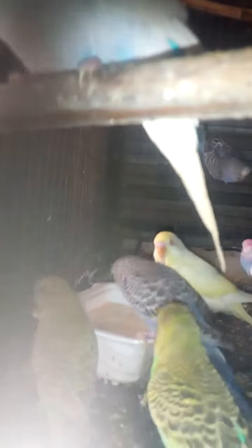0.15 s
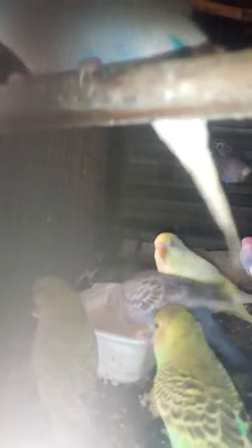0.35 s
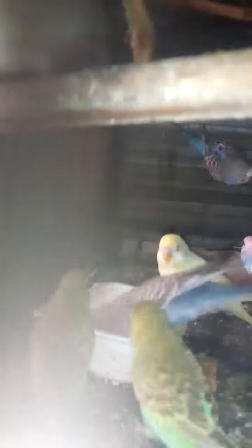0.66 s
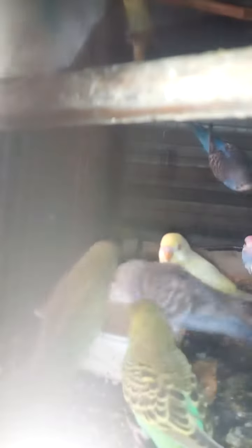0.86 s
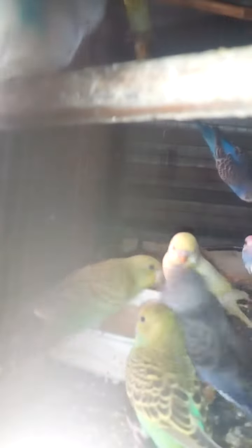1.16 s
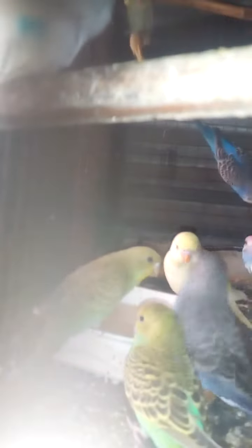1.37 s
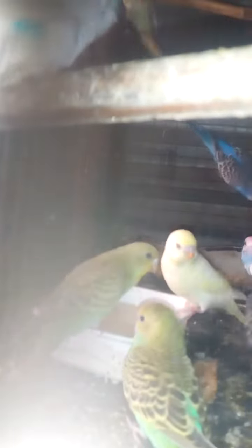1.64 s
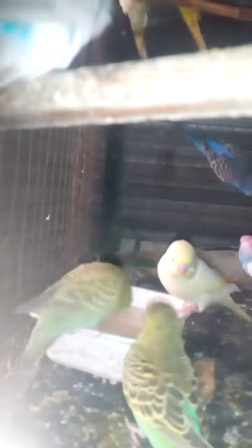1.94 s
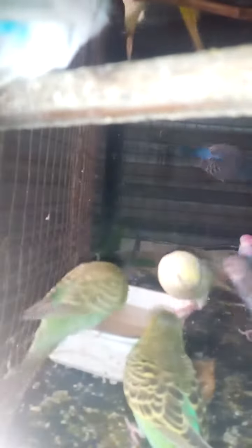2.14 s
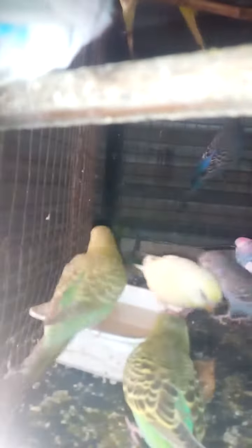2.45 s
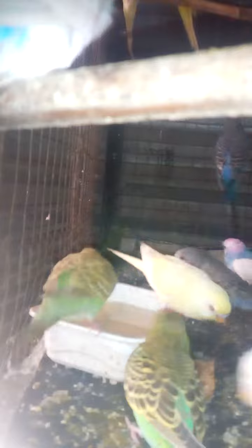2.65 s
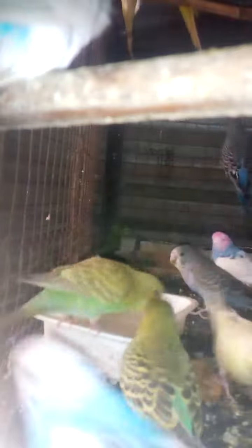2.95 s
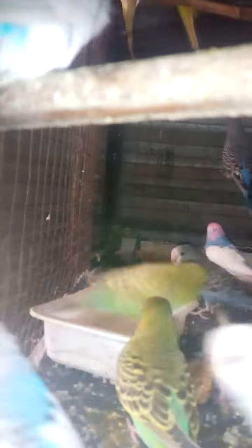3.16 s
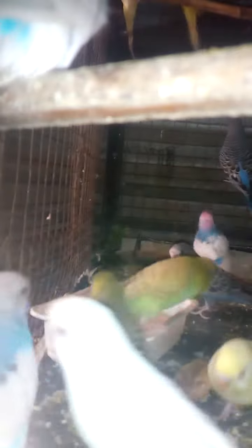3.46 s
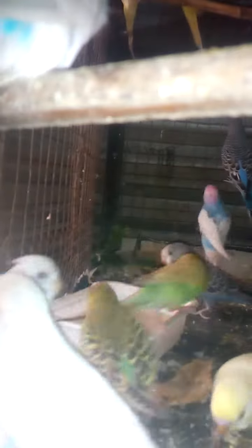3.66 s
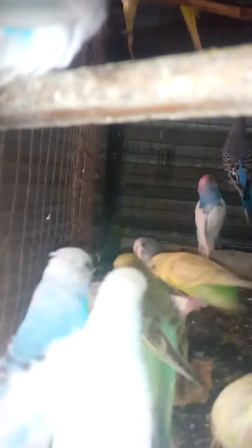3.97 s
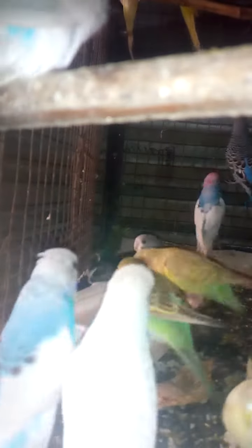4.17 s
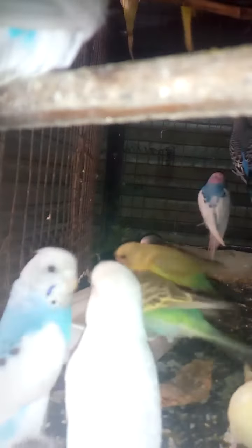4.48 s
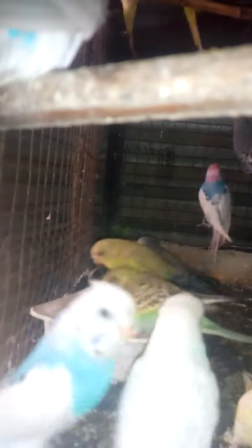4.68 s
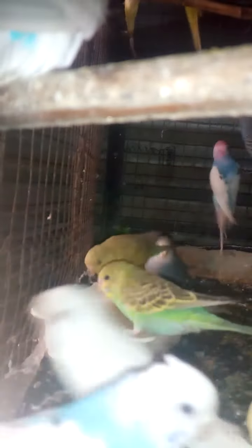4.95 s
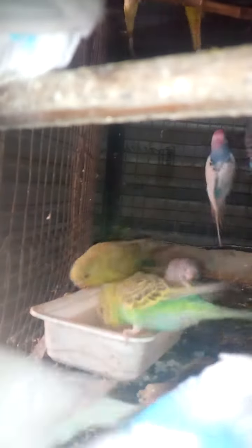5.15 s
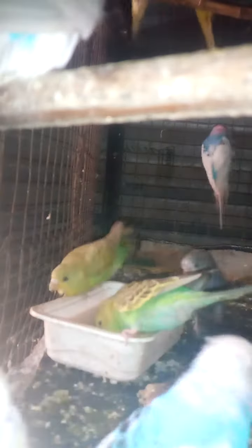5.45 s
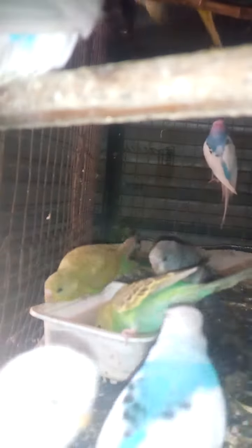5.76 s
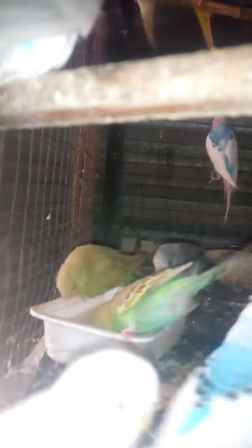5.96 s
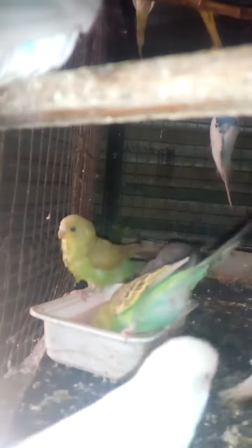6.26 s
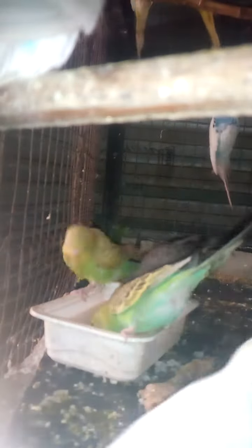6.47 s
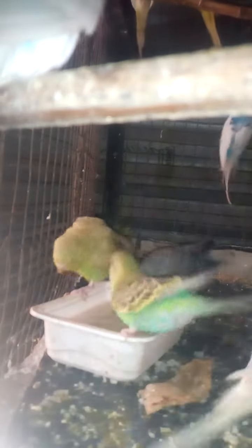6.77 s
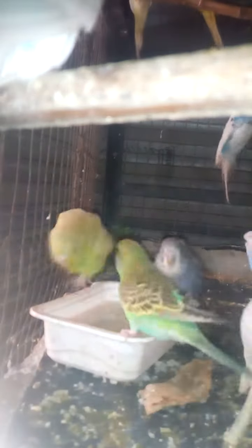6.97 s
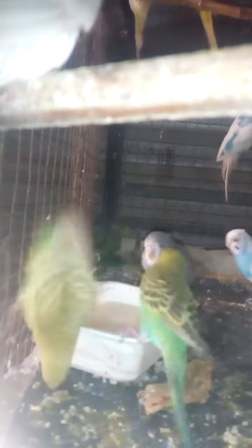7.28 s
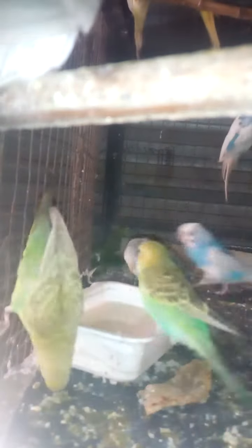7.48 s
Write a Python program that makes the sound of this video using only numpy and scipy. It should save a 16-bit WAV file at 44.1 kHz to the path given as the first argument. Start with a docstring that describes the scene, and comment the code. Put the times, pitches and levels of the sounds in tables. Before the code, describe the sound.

Small caged parrots warble, pip and squawk close by over a constantly babbling flock, with wing flutters, scuffs and a faint throbbing motor hum.

```python
"""A flock of budgerigars chatters in an aviary of wire mesh and sheet metal.
Near birds warble and pip (gliding near-sines), squawk (pulsed buzz through resonances), tick (fast upward
sweeps), flutter and scuff (shaped noise). The rest of the flock babbles behind, through the cage's ring.
A distant motor throbs underneath (swelling drone), with low rumble and soft air noise."""
import sys
import numpy as np
from scipy import signal
from scipy.fft import rfft, irfft
from scipy.io import wavfile
from scipy.ndimage import map_coordinates

SR = 44100
rng = np.random.default_rng(int(sys.argv[2]) if len(sys.argv) > 2 else 0)


def pcm_store(signal):
    """Save signal as 16-bit PCM."""
    levels = np.round(np.clip(np.atleast_2d(signal), -1, 1) * 32767)
    wavfile.write(sys.argv[1], SR, levels.astype(np.int16).T)


N = 336042


def from_db(db):
    """Amplitude factor of a level in dB."""
    return 10 ** (np.asarray(db) / 20)


def rms_one(x):
    """Scale to an RMS of 1."""
    return x / np.sqrt(np.mean(x ** 2) + 1e-20)


def in_time(rows):
    """The columns of a curve, read at every sample."""
    s, *columns = np.transpose(rows)
    return [np.interp(np.arange(N) / SR, s, c) for c in columns]


def per_bin(points):
    """A spectrum of few points, read at every FFT bin along log frequency."""
    hz, db = np.transpose(points)
    bin_hz = np.arange(N // 2 + 1) * SR / N
    return np.interp(np.log(bin_hz + 1), np.log(hz), db)


def wander(points_per_s, size):
    """Smooth random curve about 0, through `points_per_s` normal draws a second."""
    at = np.arange(size) * points_per_s / SR + rng.random()
    return map_coordinates(rng.standard_normal(1024), [at], order=2, mode="wrap")


def phase_of(hz):
    """Phase in radians of a moving frequency."""
    return 2 * np.pi * np.cumsum(hz) / SR


def resonate(x, hz, width_hz):
    """A two-pole resonance."""
    r = np.exp(-np.pi * width_hz / SR)
    return signal.lfilter([1, 0, -1], [1, -2 * r * np.cos(2 * np.pi * hz / SR), r * r], x + 1e-18)


def resonate_twice(x, hz, width_hz):
    """Two equal resonances in series: steeper flanks."""
    return resonate(resonate(x, hz, width_hz), hz, width_hz)


def ring_along(x, path_hz, width_hz):
    """A double resonance whose centre follows a moving path."""
    turn = np.exp(1j * phase_of(path_hz))
    r = np.exp(-np.pi * width_hz / SR)
    return np.real(turn * signal.lfilter([1], [1, -2 * r, r * r], x / turn))


def swell(size, rise_s, fall_s):
    """An envelope with rounded flanks."""
    t = np.arange(size) / SR
    rise = np.sin(np.pi / 2 * np.clip(t / rise_s, 0, 1))
    fall = np.sin(np.pi / 2 * np.clip((t[-1] - t) / fall_s, 0, 1))
    return rise * fall


def add(out, sound, s, pan_db=0, spread_s=0.00011):
    """Place a sound in time; it reaches one port a little before the other."""
    lag = rng.normal(0, spread_s)
    for channel, sign in enumerate((1, -1)):
        i = max(int((s + sign * lag / 2) * SR), 0)
        part = sound[:max(N - i, 0)]
        out[channel, i:i + len(part)] += part * from_db(sign * pan_db / 2)


# Still air, spectrum shape. Each row: frequency in Hz, relative density in dB.
AIR_SPECTRUM = [(40, -16), (100, -1), (240, -2), (350, 1), (520, -4), (900, -4), (3000, -10), (7000, -18),
                (12000, -29), (15500, -25)]
AIR_DB = -55


def air():
    """Soft even noise, shaped in frequency, only loosely alike at both ports."""
    mid, side = irfft(rfft(rng.standard_normal((2, N))) * from_db(per_bin(AIR_SPECTRUM)), N)
    return from_db(AIR_DB) * rms_one(mid + 0.88 * side * [[1], [-1]])


# Low rumble. Each row: time in seconds, level in dB.
RUMBLE_LEVEL = [(0, -63.5), (1.8, -62), (2.8, -54), (3.6, -56), (4.3, -65), (5.1, -52), (5.7, -62.5),
                (7.6, -68)]


def rumble():
    """Uneven noise through two low resonances gives bumps, alike at both ports."""
    lumps = rng.standard_normal(N) * from_db(3 * wander(7, N))
    level_db, = in_time(RUMBLE_LEVEL)
    upper = resonate_twice(lumps, 81, 80)
    lower = resonate(resonate(lumps, 22, 44), 22, 75)
    return from_db(level_db) * rms_one(upper + 0.41 * lower)


THROB_HZ, THROB_PEAK_S, MOTOR_DB = 7.03, -.032, -48.5


def motor(level_db):
    """A droning resonance, part tone and part rumble, swells seven times a second."""
    t = np.arange(N) / SR
    throb = 1 + 0.54 * np.cos(2 * np.pi * THROB_HZ * (t - THROB_PEAK_S))
    phase = phase_of(171 + 2.52 * wander(4.1, N))
    hum = np.sin(phase) + 0.16 * np.sin(2 * phase)
    rough = rms_one(resonate_twice(rng.standard_normal(N), 177.2, 29.5))
    boom = rms_one(resonate_twice(rng.standard_normal(N), 113.0, 21))
    return from_db(level_db) * rms_one((hum + 0.85 * rough + 0.17 * boom) * throb)


def near_walls(x, level_db):
    """Floor, dish and metal walls throw back a few quick echoes, different at each port."""
    out = x.copy()
    for k, lag in enumerate((rng.uniform(.001, .012, 12) * SR).astype(int)):
        gain = from_db(level_db) / np.sqrt(6) * (-1) ** (k // 2)
        out[k % 2, lag:] += gain * x[k % 2, :-lag]
    return out


CAGE_T60_S = 0.17


def cage(x):
    """The ring of the enclosure: twelve feedback delays a side, as strong as their input."""
    out = np.zeros((2, N))
    for k, lag in enumerate((rng.uniform(.007, .04, 24) * SR).astype(int)):
        loop = x[k % 2].copy()
        gain = from_db(-60 * lag / SR / CAGE_T60_S)
        for i in range(lag, N, lag):
            loop[i:i + lag] += gain * loop[i - lag:i][:N - i]
        out[k % 2] += (loop - x[k % 2]) * (-1) ** (k // 2)
    return rms_one(near_walls(out, 0)) * np.sqrt(np.mean(x ** 2))


FAR_WARBLE_SHARE, FAR_WARBLE_POINTS_PER_S = 0.052, 300
FAR_ROUGH, FAR_OVERTONE_DB = .55, -27


def babble(pitch_hz, spread, count):
    """Many short rough slurs at chance moments and pitches; most of them fall."""
    out = np.zeros((2, N))
    for k, (when, length) in enumerate(rng.random((count, 2))):
        centre, slope, bend, loud, pan = np.clip(rng.standard_normal(5), -2, 2)
        fall = .025 + .075 * slope
        pitches_hz = pitch_hz * np.exp(spread * centre + np.array([fall, 0.05 * bend, -fall]))
        # a bird is loudest in the middle of its range
        gain = from_db(2.5 * loud - 1.5 * centre ** 2)
        chirp = note(.006 + .03 * length ** 2, pitches_hz, FAR_ROUGH, FAR_WARBLE_SHARE,
                     FAR_WARBLE_POINTS_PER_S, overtone_db=FAR_OVERTONE_DB)
        add(out, gain * chirp, (k + when) * N / SR / count, 4 * pan)
    return rms_one(out)


def far_squawks(count):
    """Short thin squawks from the back of the aviary, with pauses between them."""
    out = np.zeros((2, N))
    for k, (when, length, pulse, shade, pan, loud) in enumerate(rng.random((count, 6))):
        call = squawk(.015 + .04 * length, 150 + 150 * pulse, .4, 5600 + 1300 * shade, 0, -1, -12)
        add(out, from_db(7 * loud) * call, (k + when / 2) * N / SR / count, 8 * (pan - .5))
    return rms_one(out)


# The flock further off, ahead of the gains below and in scene().
# Each row: time in seconds, relative level in dB.
FLOCK_LEVEL = [(0, -39.5), (.36, -48), (.6, -40.5), (1.02, -36.5), (1.17, -43.5), (1.44, -43), (1.57, -35),
               (1.7, -39), (1.86, -47), (1.97, -41), (2.1, -42), (2.42, -38), (2.54, -45), (2.61, -36),
               (2.76, -49.5), (2.83, -41.5), (3.56, -42.5), (3.66, -36.5), (3.86, -45.5), (4.03, -30.5),
               (4.15, -49), (4.36, -36.5), (4.53, -41.5), (4.9, -41.5), (5.1, -43.5), (5.55, -38),
               (5.68, -36.5), (5.81, -40), (5.91, -36.5), (6.17, -47), (6.35, -45), (6.57, -48.5),
               (6.86, -42), (7.32, -48), (7.45, -45), (7.62, -41.5)]
CHATTER_DB, CLUCKS_DB, CHIRPS_DB = 7, -6.5, -10.5  # against the flock level
FAR_RASP_DB = -54.5


def far_flock():
    """Main chatter, low clucks and high chirps swell together over steady far squawks."""
    flock_db, = in_time(FLOCK_LEVEL)
    voices = from_db(CHATTER_DB) * babble(2320, 0.16, count=410)
    voices += from_db(CLUCKS_DB) * babble(1426, 0.1643, count=140)
    voices += from_db(CHIRPS_DB) * babble(3700, 0.135, count=290)
    return from_db(flock_db) * voices + from_db(FAR_RASP_DB) * far_squawks(count=52)


# The loudest scuffs of beaks, claws and feathers on husks and wire.
# Each row: start in seconds, level in dB of the hiss before its envelope.
LOUD_SCUFFS = [(.165, -41.5), (1.245, -34.5), (2.085, -42), (2.58, -44), (2.76, -37.5), (3.052, -43),
               (3.516, -38), (4.072, -33.5), (4.46, -45), (5.094, -35.5), (5.72, -41.5), (6.078, -37.5),
               (6.201, -44), (6.488, -41), (6.845, -32), (7.295, -45), (7.584, -36)]
SCUFF_RISE_S, SCUFF_DECAY_S = 0.028, 0.017
SCUFF_HISS_HZ, SCUFF_HISS_WIDTH_HZ = 8400, 7800
SCUFFS_PER_S, FAINT_SCUFF_DB, SCUFF_SPREAD_DB = 3.6, -48, 4


def scuffs():
    """Brief gritty brushes of high noise: a few loud ones, and faint ones at chance moments."""
    out = np.zeros((2, N))
    t = np.arange(SR // 7) / SR
    shape = np.minimum(t / SCUFF_RISE_S, 1) * np.exp(-t / SCUFF_DECAY_S)
    faint = [((k + rng.random()) / SCUFFS_PER_S, rng.normal(FAINT_SCUFF_DB, SCUFF_SPREAD_DB))
             for k in range(40)]
    for s, db in list(LOUD_SCUFFS) + faint:
        grit = rng.standard_normal(len(t)) * from_db(3.1 * wander(560, len(t)))
        hiss = rms_one(resonate(grit, SCUFF_HISS_HZ, SCUFF_HISS_WIDTH_HZ))
        add(out, from_db(db) * hiss * shape, s)
    return out


def flutter(length_s, air_db, feather_db, beat_hz=19):
    """Each wing beat pushes a puff of air and brushes the feathers together."""
    size = int(length_s * SR)
    beats = 1 + 0.14 * np.sin(2 * np.pi * beat_hz * np.arange(size) / SR)
    puff, feathers = rng.standard_normal((2, SR))[:, :size]
    puff = rms_one(resonate(puff, 1015, 770))
    feathers = rms_one(resonate(feathers * from_db(5 * wander(700, size)), 9500, 9000))
    return beats * swell(size, 0.025, 0.049) * (from_db(air_db) * puff + from_db(feather_db) * feathers)


# Wing flutters. Each row: start in seconds, length in seconds, air level in dB, feather level in dB,
# both before the envelope.
WING_FLUTTERS = [(0.02, 0.21, -49, -87), (0.441, 0.19, -45, -50), (1.242, 0.098, -45, -71),
                 (2.063, 0.15, -54, -73), (3.126, 0.18, -46.5, -78), (4.671, 0.085, -47, -49),
                 (6.763, 0.079, -85, -54), (6.924, 0.17, -58.5, -47.5), (7.203, 0.073, -48.5, -46.5),
                 (7.496, 0.2, -48.5, -54)]


def flutters():
    """The wing beats of the near birds."""
    out = np.zeros((2, N))
    for s, length_s, air_db, feather_db in WING_FLUTTERS:
        add(out, flutter(length_s, air_db, feather_db), s)
    return out


# nominal start and end pitch and length; each tick is scaled by chance
TICK_START_HZ, TICK_END_HZ, TICK_S = 850, 3000, .022
TICK_BEAK_HZ, TICK_BEAK_WIDTH_HZ = 5100, 800
TICK_DB, TICK_BEAK_DB = -3.5, 1.5  # whole tick; overtones against fundamental


def tick(spread_db=0.76):
    """A hoarse whistle sweeps up too fast to follow; its overtones flash through the beak's resonance."""
    stretch, reach = from_db(spread_db * rng.standard_normal(2))
    size = int(TICK_S * stretch * SR)
    pitch_hz = reach * np.geomspace(TICK_START_HZ, TICK_END_HZ, size) * (1 + .055 * wander(900, size))
    phase = phase_of(pitch_hz)
    overtones = 0
    for k in range(2, 5):
        beak_gain = 1 / np.hypot(1, (k * pitch_hz - TICK_BEAK_HZ) / TICK_BEAK_WIDTH_HZ)
        overtones = overtones + np.sin(k * phase) * 2 / k * beak_gain
    hoarse = 1 + .35 * wander(1400, size)
    whistle = np.sin(phase) + from_db(TICK_BEAK_DB) * overtones
    return from_db(TICK_DB) * whistle * hoarse * swell(size, .005, .004)


# Ticks. Each row: middle in seconds, gain in dB.
TICK_TIMES = [(2.14, -39), (3.597, -39), (3.666, -36), (3.815, -35), (4.254, -43), (5.138, -39),
              (5.201, -37), (5.274, -36), (5.346, -36), (5.419, -35), (5.561, -38), (5.641, -39),
              (5.71, -38), (5.81, -41), (5.837, -37), (5.946, -42), (6.672, -43), (7.14, -43)]
TICK_WALL_DB = -9


def ticks():
    """A bird ticks near the wall, whose echoes soften each sweep."""
    out = np.zeros((2, N))
    for s, db in TICK_TIMES:
        sweep = tick()
        add(out, from_db(db) * sweep, s - len(sweep) / SR / 2)
    return near_walls(out, TICK_WALL_DB)


# resonances of throat and beak: (Hz, width Hz, dB); a chance size factor scales the Hz
CHEST, THROAT, BRIGHT = (1446, 740, -17.5), (2786, 470, -3.5), (4005, 840, -0.93)
HISS = (9010, 790, -0.72)
# a faint high band that accompanies the squawks, same columns and scaling
TOP_BAND = (14600, 1400, -24)
SIZE_SPREAD_SEMITONES = 0.399
SHRILL_WIDTH_HZ, SHRILL_DB, BEAK_WOBBLE_SEMITONES = 900, -0.5, 0.94


def squawk(length_s, pulse_hz, leak, shrill_hz, shrill_semitones, shrill_db, hiss_db,
           jitter=0.12, uneven_db=2.7, sweep=.3, buzz_hz=1320):
    """The syrinx chops a buzz into rapid pulses; each is a tiny falling chirp that rings throat and beak."""
    size = int((length_s + 0.0184) * SR)
    bird = 2 ** (SIZE_SPREAD_SEMITONES * rng.standard_normal() / 12)
    effort = np.abs(np.sin(np.pi * np.linspace(0, 1, size) ** .8)) ** .6
    cycle = np.cumsum(pulse_hz * (1 + jitter * wander(200, size))) / SR % 1
    opening = np.abs(np.sin(np.pi * cycle ** .6)) ** 2.2

    bend = sweep * (.3 - cycle) + .2 * (effort - .8) + .09 * wander(500, size)
    phase = phase_of(bird * buzz_hz * (1 + bend))
    buzz = rms_one(sum(np.cos(k * phase) for k in range(1, 11)))
    breath = .4 * rng.standard_normal(SR)[:size]
    source = (buzz + breath) * (opening + leak) * from_db(uneven_db * wander(156, size))

    # the beak's opening tunes the shrill resonance
    beak_semitones = shrill_semitones * np.linspace(-.5, .5, size)
    beak_semitones = beak_semitones + BEAK_WOBBLE_SEMITONES * wander(106.0, size)
    shrill = ring_along(source, shrill_hz * 2 ** (beak_semitones / 12), SHRILL_WIDTH_HZ)
    voice = from_db(SHRILL_DB + shrill_db) * rms_one(shrill * effort ** 1.84)
    bands = [(CHEST, 0), (THROAT, 0), (BRIGHT, 0), (HISS, hiss_db), (TOP_BAND, shrill_db)]
    for (hz, width_hz, band_db), db in bands:
        ringing = resonate_twice(source, bird * hz, width_hz)
        # the treble needs more effort
        voice = voice + from_db(band_db + db) * rms_one(ringing * effort ** np.sqrt(hz / 4500))
    return voice


# Rasping squawks. Each row: nominal start in seconds, nominal length in seconds, pulses per second,
# leak (share of air passing between pulses, which blurs them), gain in dB, shrill resonance in Hz,
# its glide in semitones, shrillness in dB, hiss in dB (both against the body), pan in dB left over right.
SQUAWK_CALLS = [(0.283, 0.063, 207, 0.8, -41, 7050, 3.5, 8.5, -4, 3),
                (0.482, 0.045, 183, 1, -43.5, 6570, -3.5, 14, 8.5, 4),
                (0.62, 0.0334, 450, 0.49, -34.5, 4430, 4, -22, -30, 0),
                (0.662, 0.055, 203, 0.76, -31, 6450, 2.5, 2.5, -7.5, 2),
                (0.783, 0.051, 290, 0.63, -35, 6260, -4.5, 8, -4.5, 3.5),
                (0.901, 0.04, 305, 0.34, -31, 6400, 1, -0.5, -15.5, 4),
                (0.963, 0.061, 230, 0.25, -34.5, 5300, 1, -3, -25, 7),
                (1.027, 0.038, 330, 0.35, -30.5, 6120, -0.5, 5.5, -10.5, 4),
                (1.534, 0.035, 200, 0.4, -43, 5400, -3, -10, -35, 2),
                (2.005, 0.043, 167, 0.17, -36, 6340, 1.5, 11.5, -12.5, 9.5),
                (2.175, 0.06, 265, 0.18, -30.5, 5700, 2.5, 3, -17, 8.5),
                (2.243, .055, 172, 0.2, -36.5, 6000, -3, 0.5, -44, 14.5),
                (2.336, 0.09, 150, 0.56, -32.5, 4960, -3, -7.5, -28.5, 9),
                (2.686, 0.04, 370, 0.31, -49, 4400, -5, 0, -26, 10),
                (3.183, 0.066, 130, 0.39, -34, 5830, 1, 3, -16.5, 4),
                (3.738, 0.054, 140, 0.27, -36, 5300, 1, -15.5, -42, -2),
                (4.018, 0.06, 167, 0.57, -36.5, 5700, 3.5, 1.5, -17, 8.5),
                (4.348, 0.035, 190, 0.72, -39, 6600, 1.5, 9, -1, -0.5),
                (4.562, 0.066, 142, 0.41, -38, 7030, -2, -4, -36, -4),
                (4.671, 0.06, 260, 0.6, -39, 6500, -1, -3.5, -10.5, 2),
                (4.74, 0.0107, 230, 0.5, -40, 5760, -4, 4, -16, 5.5),
                (4.82, 0.0226, 190, 0.47, -32, 4270, -4, -7, -35, -4.5),
                (4.867, .016, 193, 0.57, -34, 4300, -1, -7, -39, 7),
                (5.008, 0.06, 430, 0.28, -37.5, 3770, 3, 1, -25, 0),
                (5.449, 0.048, 226, 0.2, -28.5, 6130, 2, -17, -43, 0.5),
                (5.672, .04, 157, .2, -43, 1150, -7, 4.5, -57, 6),
                (5.86, 0.0445, 194, .2, -33, 2680, 4, 1.5, -38, 4.5),
                (5.973, 0.0134, 140, 0.43, -48, 5100, -2, 3.5, -30, 4),
                (6.287, 0.05, 230, .5, -39, 6200, 6, 1, -15, 3.5),
                (6.94, 0.12, 270, .4, -41.5, 5700, -2, -14, -12, 3.5),
                (7.445, 0.04, 152, 0.66, -40.5, 6030, -4, -1.5, -17.5, 5)]


def squawks():
    """The rasping calls of the near birds."""
    out = np.zeros((2, N))
    for s, length_s, pulse_hz, leak, db, shrill_hz, semitones, shrill_db, hiss_db, pan_db in SQUAWK_CALLS:
        call = squawk(length_s, pulse_hz, leak, shrill_hz, semitones, shrill_db, hiss_db)
        add(out, from_db(db) * call, s - .007, pan_db)
    return out


# a trill at full roughness: mean rate, swing of pitch and of strength
TRILL_HZ, TRILL_PITCH_SHARE, TRILL_DEPTH_SHARE = 562, 0.05, 0.2


def note(length_s, pitches_hz, rough, warble, warble_rate, overtone_db=-39, shake_db=4.5, hoarse=0.48,
         rise_s=0.0025, fall_s=0.0057):
    """A near sine glides through three pitches; roughness makes the syrinx shake and trill it."""
    size = int((length_s + 0.0035) * SR)
    pitch_hz = np.polyval(np.polyfit([0, .5, 1], pitches_hz, 2), np.linspace(0, 1, size))
    trill = rough * np.sin(phase_of(TRILL_HZ * (1 + .25 * wander(250, size))))
    shaken = 1 + rough * warble * wander(warble_rate, size) + TRILL_PITCH_SHARE * trill
    phase = phase_of(pitch_hz * shaken)
    tone = np.sin(phase) + from_db(overtone_db) * (np.sin(2 * phase) + 0.4 * np.sin(3 * phase))
    strength = from_db(np.sqrt(abs(rough)) * shake_db * wander(151.0, size))
    strength = strength * (1 + TRILL_DEPTH_SHARE * trill + rough * hoarse * wander(1202, size))
    return rms_one(tone * strength * swell(size, rise_s, fall_s))


BOW_SPREAD_SEMITONES = 0.59


def glide(pitch_hz, semitones):
    """Start, middle and end pitch of a note that slides through its centre in a slight bow."""
    bow = BOW_SPREAD_SEMITONES * rng.standard_normal()
    return pitch_hz * 2 ** (np.array([-semitones / 2 - bow, bow / 2, semitones / 2 - bow]) / 12)


WARBLE_SHARE, WARBLE_POINTS_PER_S = 0.065, 350  # near birds' pitch shake at roughness 1

# Single short strokes of voice from the nearest birds.
# Each row: start in seconds, pitch in Hz, level in dB, pan in dB left over right.
PIP_STROKES = [(0.068, 2590, -41, 3), (.378, 2290, -39, 17), (.405, 2340, -21.5, -4.5),
               (.421, 2120, -38, 13), (0.544, 2740, -27.5, 6), (.558, 2620, -33, 15.5),
               (1.114, 2490, -28, 3), (2.565, 2520, -32, 0), (3.423, 2600, -35.5, 3),
               (3.922, 2550, -23.5, -2), (4.438, 2660, -27, -1), (4.451, 2590, -32, 2),
               (5.424, 1907, -26, 10), (5.44, 1860, -25.5, 9), (5.62, 2710, -22.5, -5.5),
               (5.641, 2676, -26.5, 7.5)]
PIP_S, PIP_FALL_SEMITONES, PIP_ROUGH = 0.0085, 1.54, 0.15  # note() adds 3.5 ms


def pips():
    """Short falling strokes, so close that they stay crisp."""
    out = np.zeros((2, N))
    for s, pitch_hz, db, pan_db in PIP_STROKES:
        pitches_hz = glide(pitch_hz, -PIP_FALL_SEMITONES)
        pip = note(PIP_S, pitches_hz, PIP_ROUGH, WARBLE_SHARE, WARBLE_POINTS_PER_S)
        add(out, from_db(db) * pip, s, pan_db)
    return out


# The clearest warbled notes. Each row: start in seconds, length in seconds (note() adds 3.5 ms),
# pitch in Hz, glide in semitones, level in dB, pan in dB left over right, roughness (0 is smooth).
WARBLED_NOTES = [(0.0, 0.013, 2535, -1.5, -28.5, -0.5, 1.22), (.085, 0.055, 2570, 1.5, -33.5, 2, 1.07),
                 (0.14, 0.027, 2625, -2, -29, 6, 0.77), (0.169, 0.031, 2536, 4.5, -26, 4, 0.76),
                 (0.204, 0.042, 2582, -2, -20, 0.5, 0.36), (0.252, 0.021, 2370, -0.5, -27.5, 2, 0.9),
                 (0.269, 0.019, 2646, 1, -19, -5.5, 0.33), (0.289, 0.0365, 2460, -1.5, -27, 1, 0.65),
                 (0.368, 0.028, 3180, -3, -35.5, 3, 0.3), (0.472, 0.033, 2606, 3, -26.5, 4.5, 0.3),
                 (0.659, 0.042, 3030, 0, -23.5, -8, 0.44), (0.715, 0.049, 2400, -7, -30, 4.5, 0.7),
                 (0.751, 0.045, 4230, 1, -34, 2, 0.45), (0.819, 0.023, 2690, 1, -36, 7, 0.53),
                 (0.857, 0.023, 1990, -1.5, -36.5, 4, 0), (0.874, 0.057, 3100, -1.5, -33.5, 10.5, 0.52),
                 (0.933, .08, 3750, -0.5, -33, 7, 0.79), (0.997, 0.042, 2716, 2, -35, -2, 0.6),
                 (1.127, 0.11, 2070, -4, -37.5, -4, 0.28), (1.218, 0.062, 1705, -5, -39.5, 1, 0.25),
                 (1.463, 0.032, 2310, 3.5, -43, 1, 0), (1.608, 0.025, 2620, 6, -34, -3, 0.1),
                 (1.638, .012, 2780, -1.5, -23.5, -6, 0), (1.706, 0.019, 2790, 1, -31.5, 3.5, 0.14),
                 (1.728, 0.055, 3720, -1, -39.5, 4, 0.7), (1.774, 0.056, 1327, 4.5, -44.5, 3, .3),
                 (1.9, 0.039, 2130, -0.5, -43, 9, 0.2), (1.955, 0.038, 3140, -0.5, -41, 11, 0.3),
                 (2.343, 0.042, 2464, 0.5, -20, -4, 0.1), (2.481, 0.073, 1390, -1, -45, 3, 0.24),
                 (2.629, 0.022, 1398, 3, -37, -1, 0.76), (2.669, 0.017, 3410, -4, -46, 24, 0.3),
                 (2.68, 0.011, 4340, 0.5, -30.5, 16, 0.3), (2.706, 0.027, 2630, 3, -35, 7, 0.25),
                 (2.807, 0.027, 2680, -0.5, -37, 4, 0.5), (2.875, 0.028, 2680, 0, -47, 7, .4),
                 (2.961, 0.064, 2390, -1.5, -37.5, 3, 0.57), (3.119, 0.058, 1101, 0, -35, 0, 0.53),
                 (3.18, 0.045, 1166, 4, -35.5, 2, 0.4), (3.294, 0.02, 1573, -2.5, -35, 13.5, 0.2),
                 (3.335, 0.057, 2026, -10.5, -31, 4.5, 0.36), (3.634, 0.044, 1218, -3, -39.5, 2, 0.6),
                 (3.908, 0.039, 2844, -4.5, -33.5, 1, 0.15), (3.945, 0.022, 3900, 4, -42.5, -6, 0.36),
                 (3.969, 0.025, 3750, 6.5, -37, 0, 0.35), (4.021, 0.05, 1830, -5.5, -33, 10, 0.46),
                 (4.085, .06, 1556, -5, -42, 6.5, .3), (4.156, 0.26, 2063, 0.5, -41.5, 5.5, 0.4),
                 (4.413, 0.015, 2580, 2, -36.5, -1, 0.3), (4.473, 0.02, 2680, -2.5, -30, -6, 0.3),
                 (4.506, 0.015, 2620, -0.5, -32, -11, 0), (4.668, 0.019, 2114, -1, -33.5, 9, 0.62),
                 (4.816, 0.051, 2400, -4, -28.5, 4.5, 0.65), (4.86, 0.089, 2595, -1, -35.5, -1, 0.38),
                 (4.885, 0.024, 1426, -5, -40.5, 3, 0.35), (5.272, 0.021, 2690, 3, -35, 6, 0.42),
                 (5.461, 0.013, 3510, -1.5, -24, 3, 0.4), (5.481, 0.013, 3780, 4, -23.5, -3, 0.5),
                 (5.664, 0.017, 702, -0.5, -37, -1, 0), (5.697, 0.02, 1432, -8, -38, 7.5, 0.65),
                 (5.732, 0.032, 1160, -2, -29, 4, 0.14), (5.969, .13, 2410, -1, -34, -3, 0.7),
                 (6.0, .13, 1430, -12, -47, 1, .3), (6.098, 0.069, 2070, -4, -44, 5, 0.27),
                 (6.202, .085, 2026, 0.5, -41.5, 2.5, 0.3), (6.288, .03, 2653, 2, -35.5, -1, 0.06),
                 (6.585, 0.015, 2640, 2, -32, 1, 0), (6.637, 0.047, 2090, -1, -40.5, 14, 0.47),
                 (6.794, 0.087, 2032, -3, -40.5, 4.5, 0.6), (6.899, 0.017, 1820, -5, -36.5, 2, 0),
                 (6.925, .014, 1830, 3, -33, 0, 0), (6.941, 0.036, 2398, 2.5, -27, 2.5, 0.48),
                 (6.992, 0.069, 2455, 0, -30, 1.5, 1), (7.348, 0.024, 2580, -7, -39, 0, 0.4),
                 (7.384, 0.041, 3374, -1, -45, 18, 0.32)]


def warbles():
    """The gliding notes of the birds round the water dish."""
    out = np.zeros((2, N))
    for s, length_s, pitch_hz, semitones, db, pan_db, rough in WARBLED_NOTES:
        pitches_hz = glide(pitch_hz, semitones)
        warble = note(length_s, pitches_hz, rough, WARBLE_SHARE, WARBLE_POINTS_PER_S)
        add(out, from_db(db) * warble, s, pan_db)
    return out


NEAR_WALL_DB, CAGE_DB = -8, -12  # near birds: quick echoes; send to the cage
FAR_DIRECT_DB, FAR_CAGE_DB = -3.5, -4.5


def scene():
    """Near birds are fairly dry; the far flock is heard both directly and through the ring of the cage."""
    near = near_walls(warbles() + squawks() + flutters() + scuffs(), NEAR_WALL_DB) + pips() + ticks()
    far = far_flock()
    ring = cage(from_db(CAGE_DB) * near + from_db(FAR_CAGE_DB) * far)
    birds = near + from_db(FAR_DIRECT_DB) * far + ring
    return birds + motor(MOTOR_DB) + rumble() + air()


# The two microphone ports hear differently. Each row: frequency in Hz, left minus right in dB.
PORT_BALANCE = [(100, 4.5), (200, 7), (400, 3), (700, 2.5), (1100, -0.5), (1500, 4.5), (1900, 13),
                (2400, 14), (3000, 18), (3800, 5), (4800, -1), (6500, -1.5), (9000, -11), (14000, -9)]
CUTOFF_HZ = 15800


def record(dry):
    """The ports share out each frequency unequally; the top is cut."""
    ratio = from_db(per_bin(PORT_BALANCE))
    ports = np.array([ratio, np.ones_like(ratio)]) * np.sqrt(2 / (1 + ratio ** 2))
    heard = irfft(rfft(dry) * ports, N)
    top_cut = signal.ellip(10, .1, 60, CUTOFF_HZ, fs=SR, output="sos")
    return signal.sosfiltfilt(top_cut, heard)


dry = scene()
out = record(dry)
pcm_store(out)
```